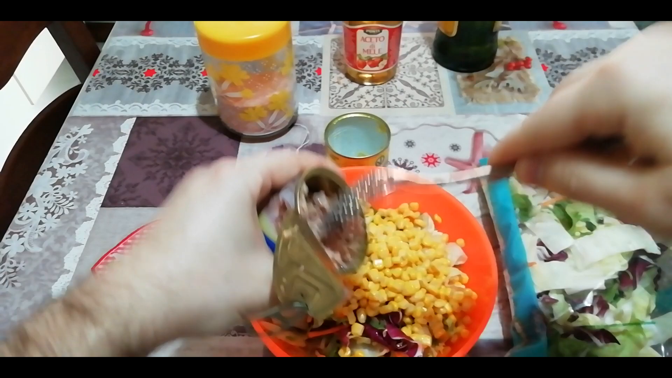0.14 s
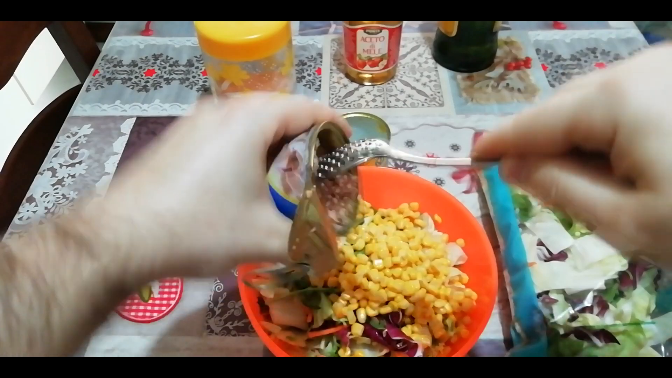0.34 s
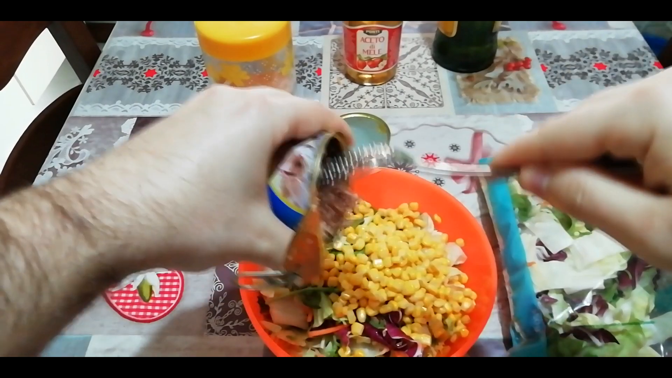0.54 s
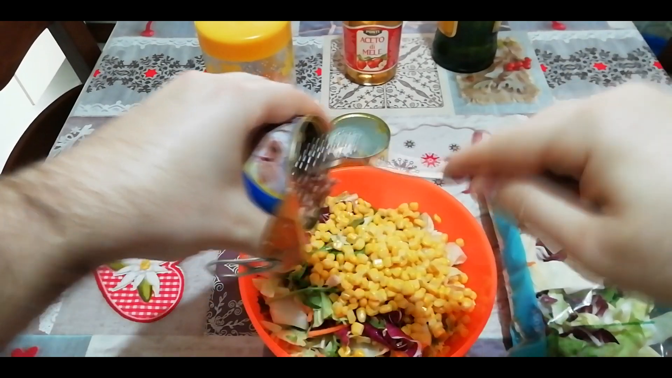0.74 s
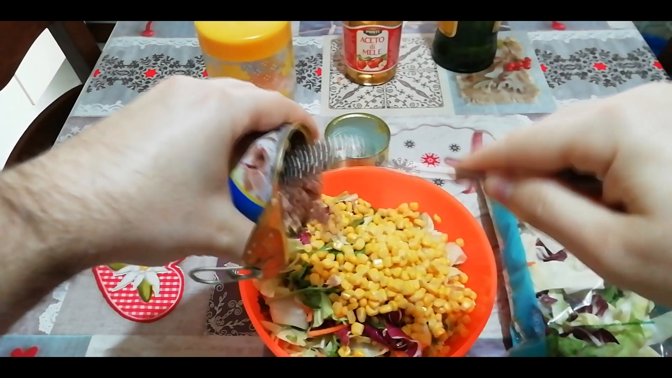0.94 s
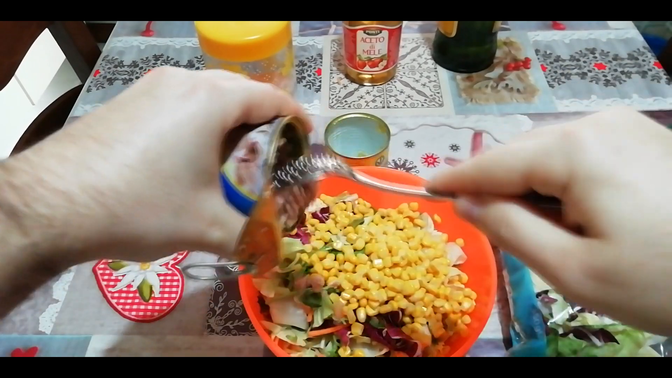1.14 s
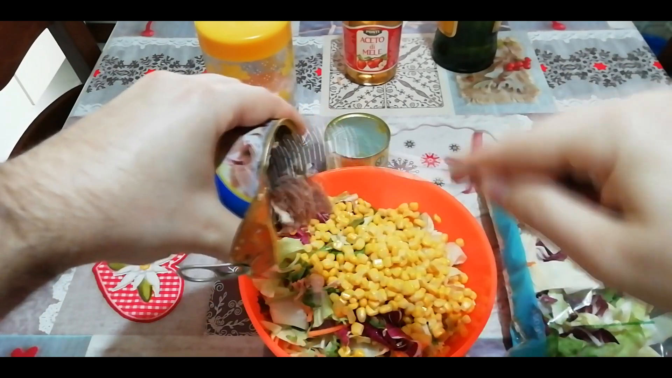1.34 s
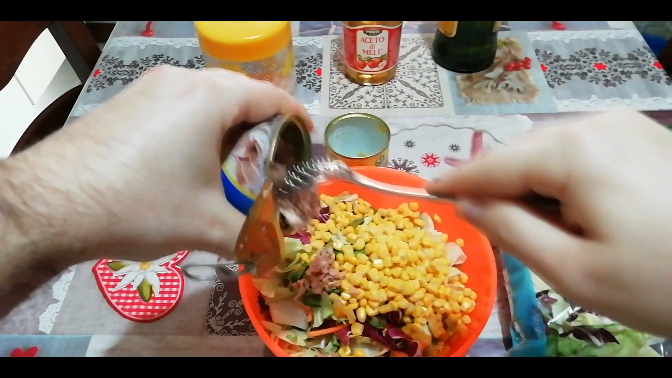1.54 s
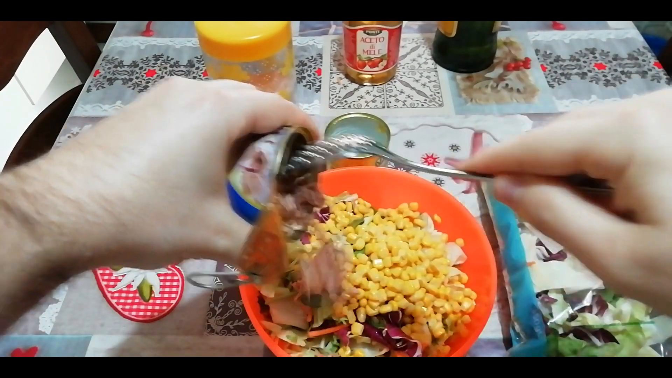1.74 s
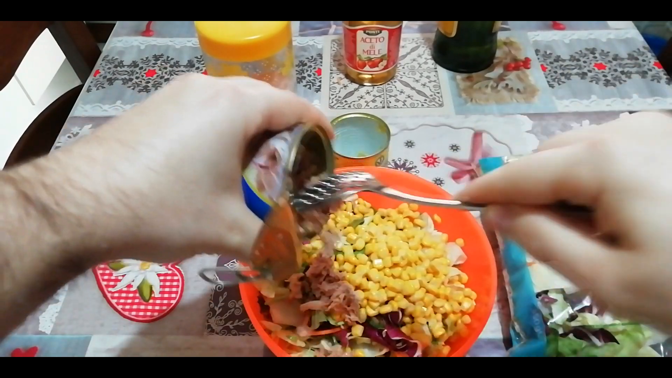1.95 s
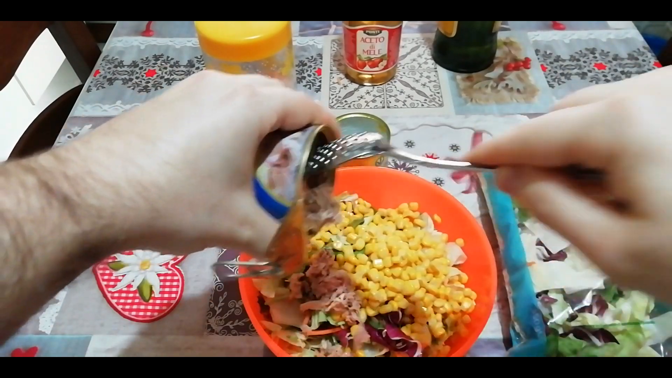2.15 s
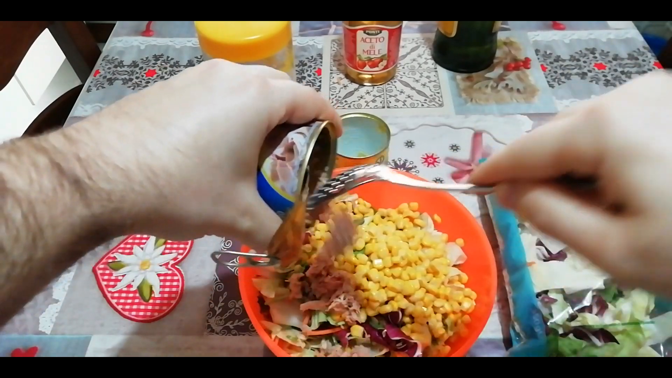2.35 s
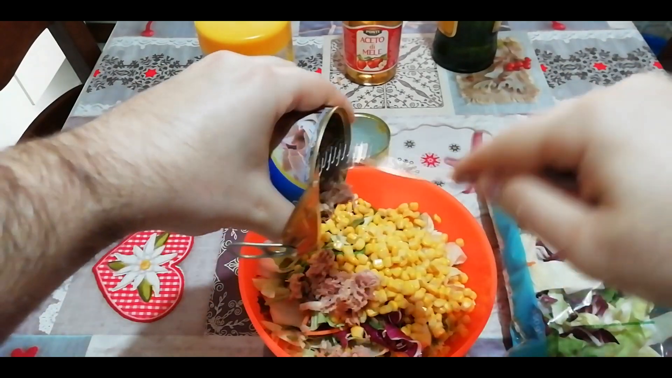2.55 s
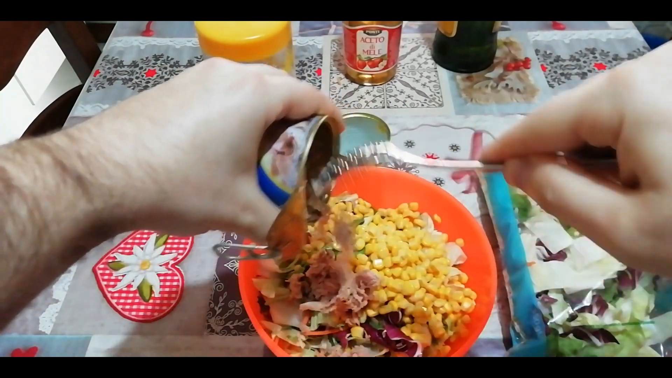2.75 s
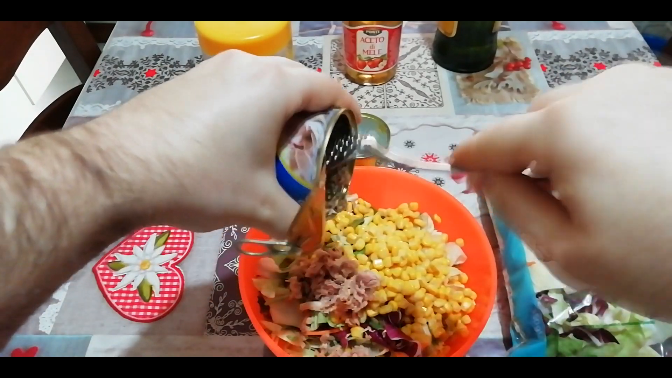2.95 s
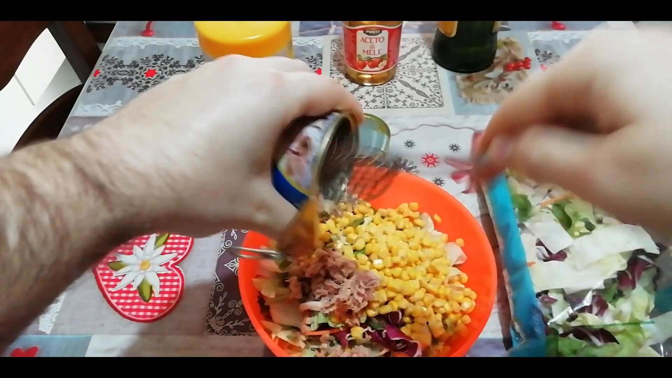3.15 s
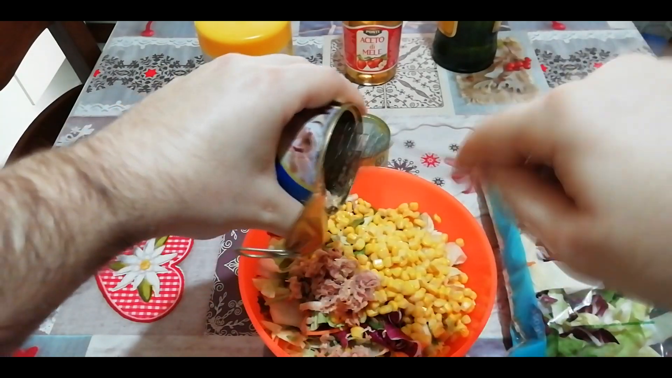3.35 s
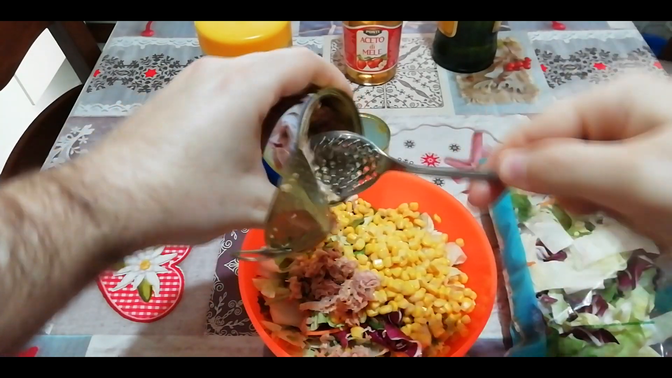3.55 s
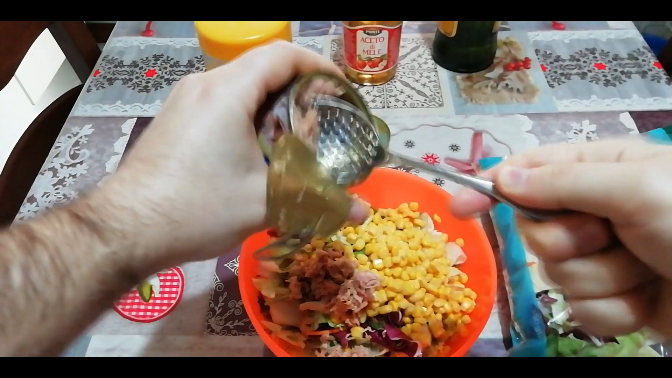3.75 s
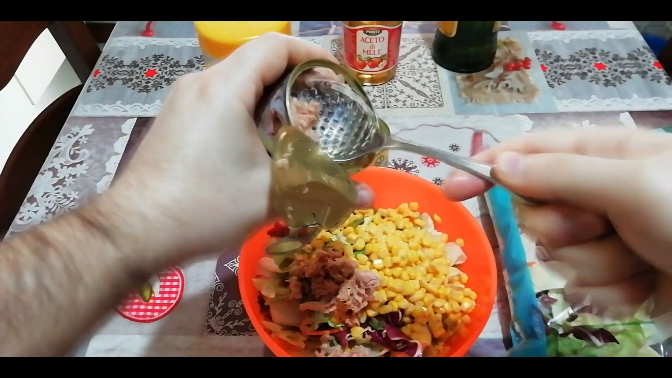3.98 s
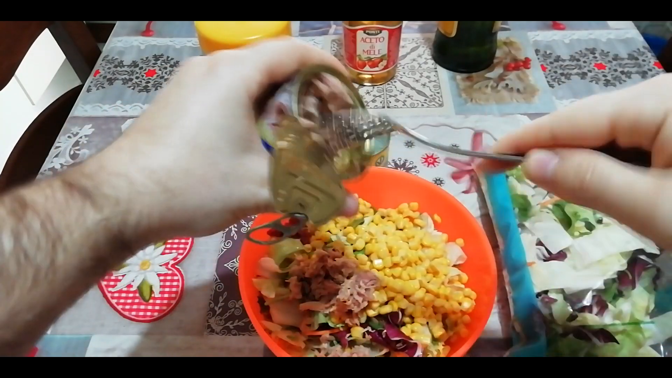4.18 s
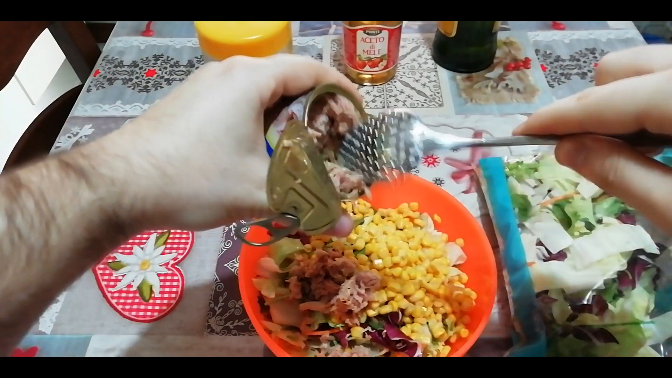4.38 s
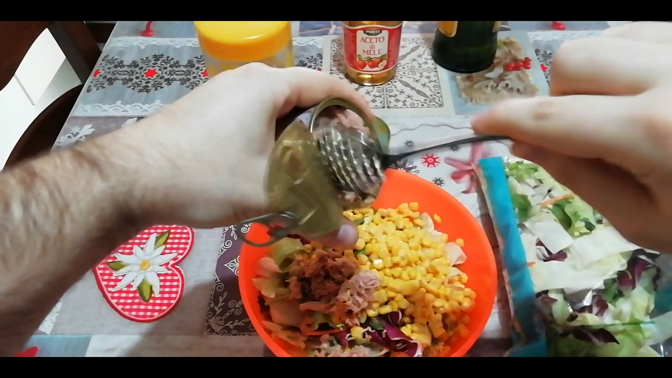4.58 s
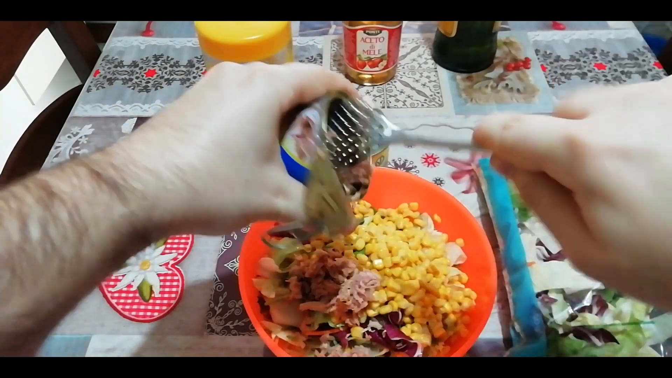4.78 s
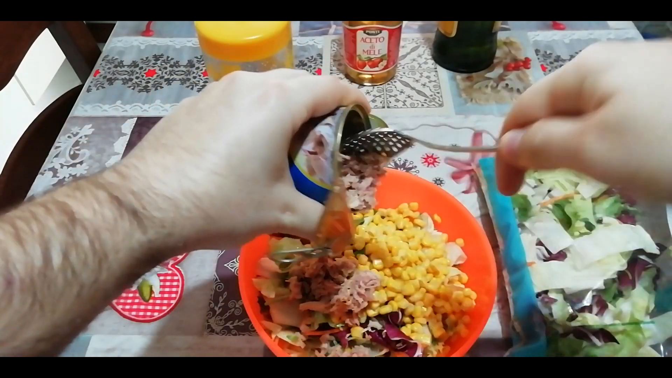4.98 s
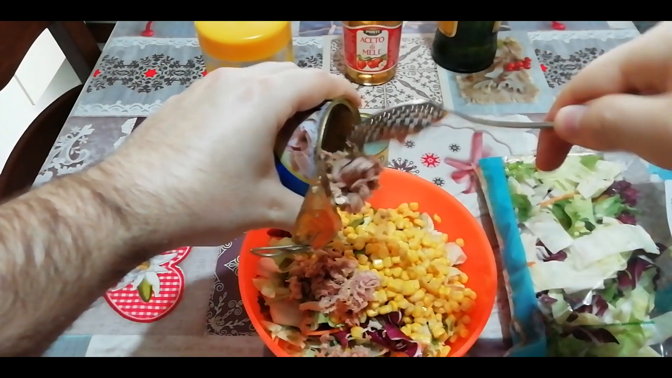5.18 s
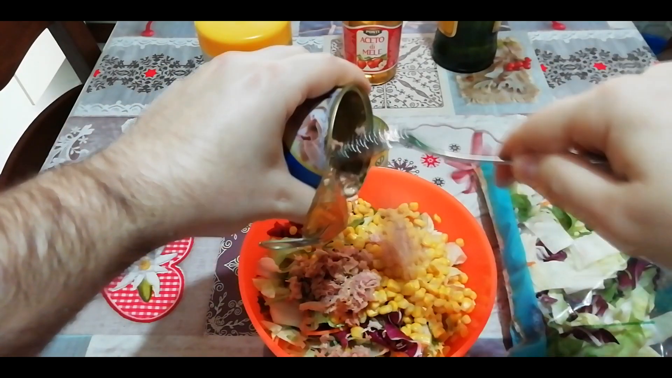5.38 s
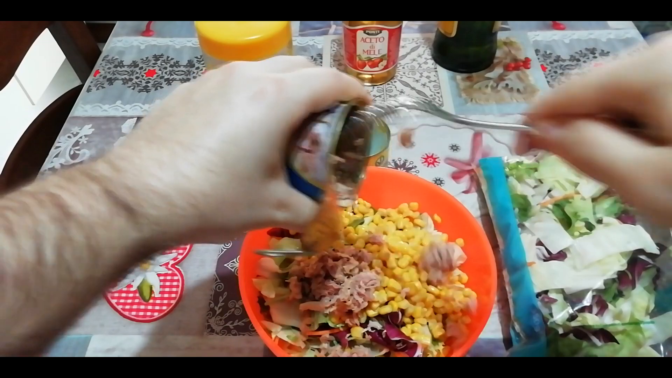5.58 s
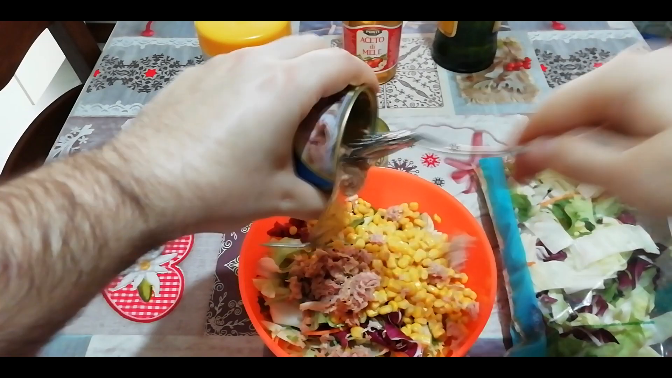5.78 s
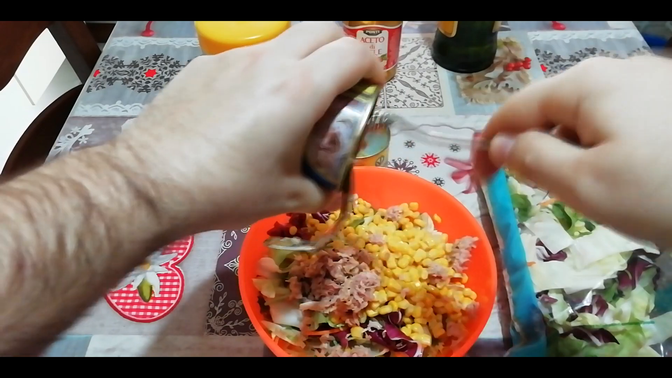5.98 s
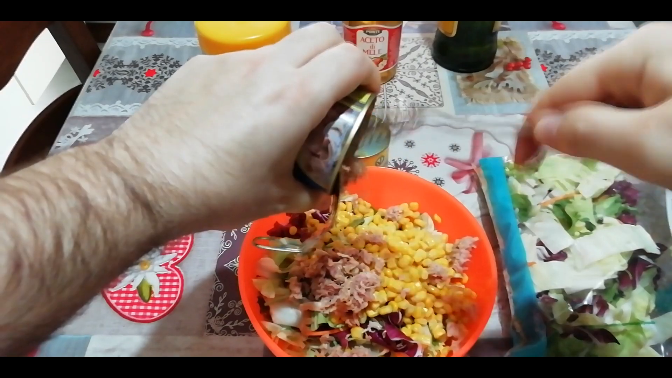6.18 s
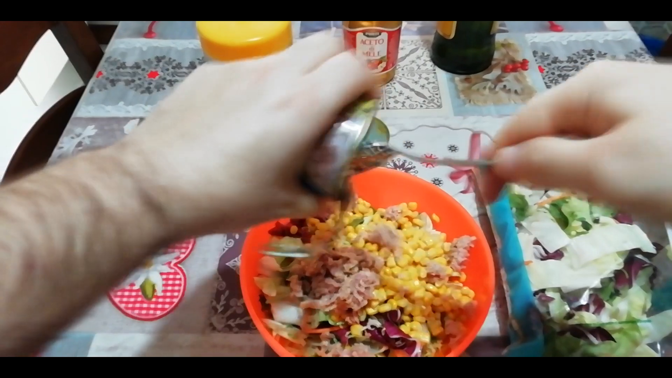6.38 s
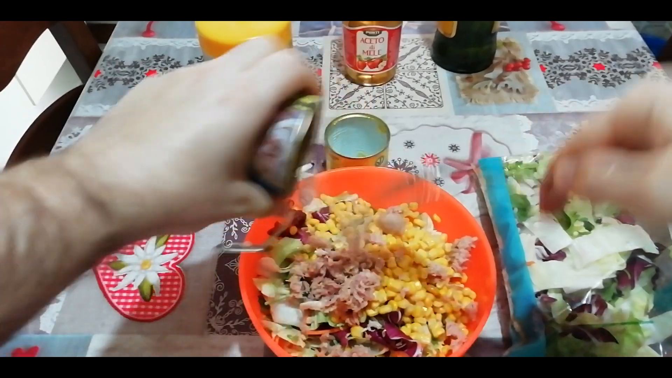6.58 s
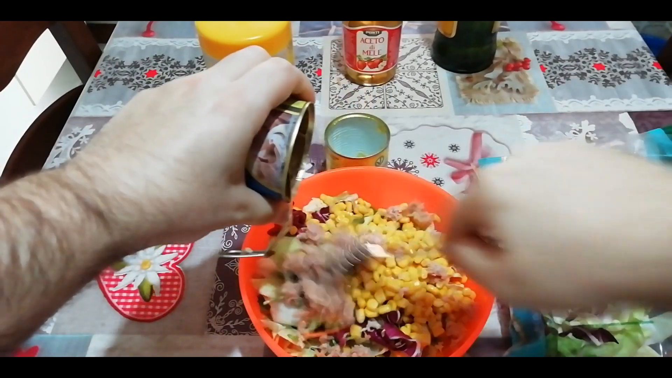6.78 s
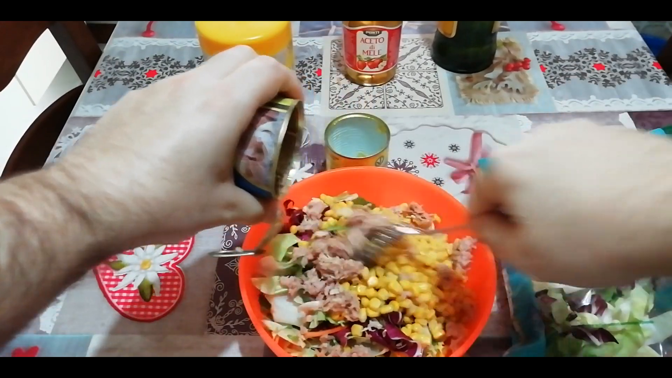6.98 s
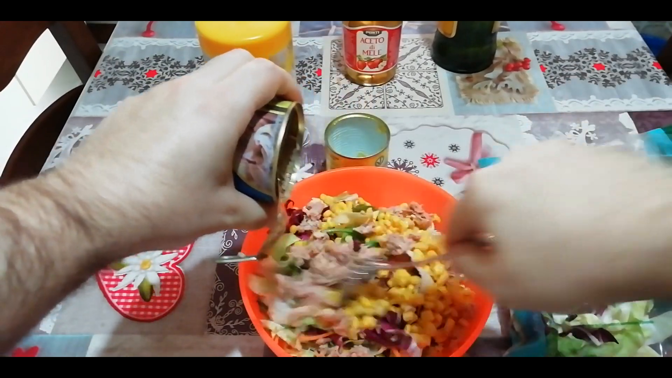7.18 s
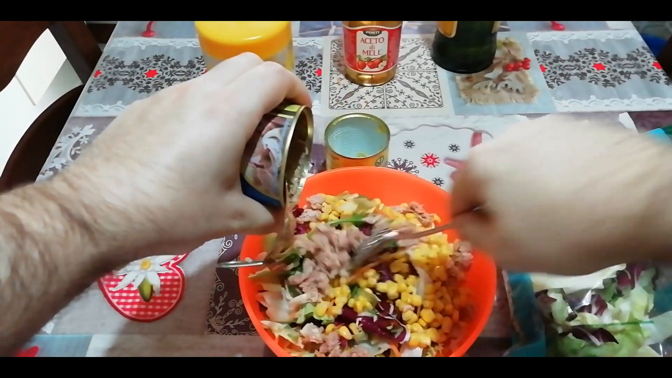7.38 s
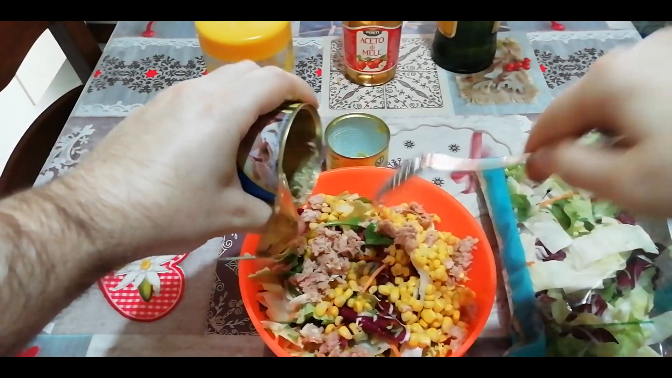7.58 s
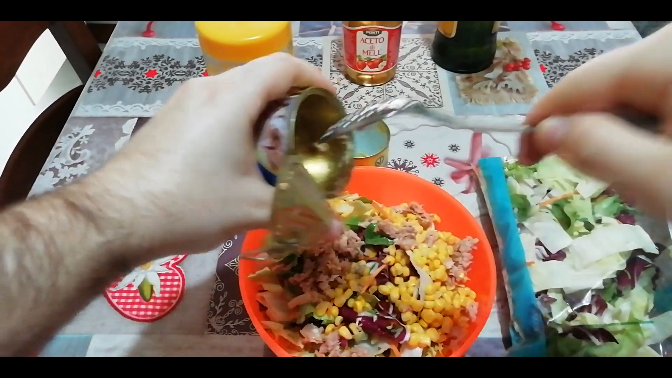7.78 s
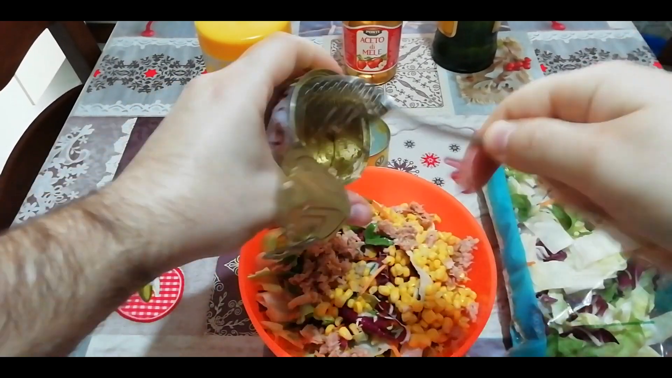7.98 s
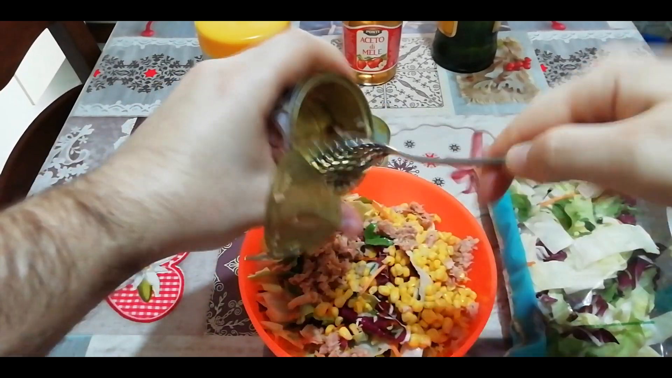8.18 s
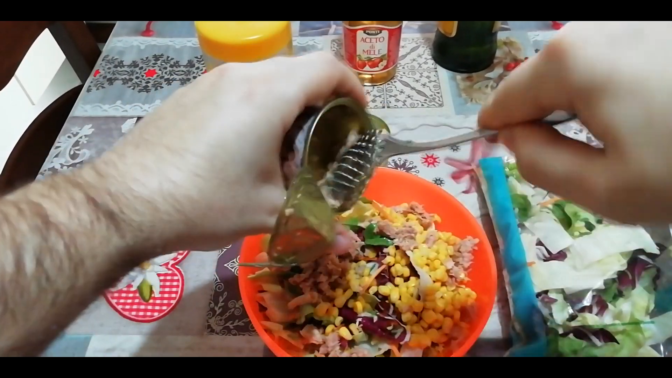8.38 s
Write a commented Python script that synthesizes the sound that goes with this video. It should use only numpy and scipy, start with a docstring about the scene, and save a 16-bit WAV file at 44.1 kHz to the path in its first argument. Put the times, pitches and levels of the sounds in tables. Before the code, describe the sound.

Close metallic taps and short gritty scrapes of fork on tin, soft wet food rustle, then brighter ringing knocks as the tin empties.

```python
"""In a small kitchen a fork digs tuna out of a hand-held tin over a salad bowl, close to two microphones.
Knocks are impulses into damped resonances of tin and fork; scrapes drive the same metal by stick-slip.
The wall is dull while the tin is full; as it empties, knocks ring longer and scrapes ring higher.
Coloured noise pops make the moist food, ticking flakes and fizzing oil; still air and a faint hum lie below."""
import sys
import numpy as np
from scipy import signal
from scipy.fft import rfft, irfft, next_fast_len
from scipy.io import wavfile

SR = 44100
rng = np.random.default_rng(int(sys.argv[2]) if len(sys.argv) > 2 else 0)


def generate_wav(signal):
    """Clip the signal to [-1, 1] and save it as 16-bit WAV at the path in sys.argv[1]."""
    frames = np.transpose(np.atleast_2d(signal))
    scaled = np.clip(frames, -1, 1) * 32767
    pcm = np.round(scaled).astype(np.int16)
    wavfile.write(sys.argv[1], SR, pcm)


N = 371763
TIME = np.arange(N) / SR
CUTOFF_HZ = 15800
FORK_HZ = 2805
STEEL_FOLLOWS = .4   # dB per dB: more tines or a harder push also rings the fork more

# frequency ranges of lid, wall, fork shank and tines [low_hz, high_hz]
PART_RANGES = [(260, 1000), (1050, 2300), (2350, 4400), (4600, 16500)]
# friction spectrum of steel on tin [frequency_hz, gain_db]
FRICTION_SPECTRUM = [(300, -13.5), (1500, -2), (3700, -1.5), (4500, -2), (7200, -1.5), (7800, 2.5),
                     (11000, -2), (15000, -4)]


def from_db(db):
    """Amplitude gain is ten to the power of decibels over twenty."""
    return 10 ** (np.asarray(db) / 20)


def rms_one(x):
    """Normalization divides a signal by its root mean square."""
    return x / np.sqrt(np.mean(x ** 2) + 1e-20)


def at_hz(points, hz, axis=1):
    """A spectrum is interpolated linearly on a log-frequency axis."""
    points = np.array(points)
    return np.interp(np.log(np.maximum(hz, 1)), np.log(points[:, 0]), points[:, axis])


def colour(x, spectrum):
    """Linear filtering multiplies a signal's spectrum by a gain curve."""
    n = x.shape[-1]
    size = next_fast_len(n)
    gain = from_db(at_hz(spectrum, np.fft.rfftfreq(size, 1 / SR)))
    return irfft(rfft(x, size) * gain, size)[..., :n]


def band(x, low, high, order=3):
    """A causal Butterworth band-pass keeps one frequency range."""
    edges = [low, min(high, SR / 2 - 100)]
    return signal.sosfilt(signal.butter(order, edges, "band", fs=SR, output="sos"), x)


def drift(per_s, n):
    """Slow random modulation joins Gaussian values, drawn per_s times a second, by straight lines."""
    place = np.arange(n) * per_s / SR
    knots = np.random.default_rng(rng.integers(2 ** 31)).standard_normal(int(place[-1]) + 2)
    return np.interp(place, np.arange(len(knots)), knots)


def resonate(x, hz, width):
    """A damped mode is a two-pole resonance, with gain near 1 at its peak; its width sets its decay."""
    r = np.exp(-np.pi * width / SR)
    zeros = np.array([1, 0, -1]) * (1 - r * r) / 2
    poles = [1, -2 * r * np.cos(2 * np.pi * hz / SR), r * r]
    return signal.lfilter(zeros, poles, x + 1e-18)


def grains(n, per_s, spread_db):
    """A random point process gives clicks of uneven size and either sign."""
    sizes = from_db(spread_db * np.minimum(rng.exponential(1, n), 4)) * rng.choice([-1, 1], n)
    return sizes * (rng.random(n) < per_s / SR)


def add(track, s, sound):
    """Superposition mixes a sound into the track at time s."""
    at = max(round(s * SR), 0)
    track[..., at:at + sound.shape[-1]] += sound[..., :N - at]


def pushes(rows, steepness=1):
    """Each push is an asymmetric exponential envelope that grows to its peak and dies away."""
    build_share = 0.63
    total = 0
    for s, length, db in rows:
        time_constant = length * np.where(TIME < s, build_share, 1 - build_share)
        total = total + from_db(db) * np.exp(-np.abs((TIME - s) / time_constant) ** steepness)
    return total


def fill_at(s):
    """Mass loading and damping follow the share of tuna in the tin."""
    # tuna in the tin [time_s, share 0-1]
    fill_curve = [(0, 0.82), (3, 0.9), (5.4, 0.47), (5.7, 0.42), (8.4, 0.18)]
    return np.clip(np.interp(s, *np.transpose(fill_curve)), 0, 1)


def metal(force, gripped_modes, scatter_db, shifts_per_s):
    """Modal synthesis: the contact point sets each mode's drive; grip and filling tune a few more modes."""
    # modes that ring wherever the metal is touched [frequency_hz, width_hz, gain_db]
    fixed_modes = [(480, 220, -7), (1318, 80, 9), (2802, 80, 6), (3290, 200, 2), (3780, 260, 1),
                   (5480, 200, 5), (5890, 240, 4), (6350, 320, 1), (6850, 450, 5), (10200, 800, -8),
                   (13200, 1200, -6), (14850, 700, -2)]
    total = 0
    for hz, width, db in fixed_modes + gripped_modes:
        drive = force * from_db(db + scatter_db * drift(shifts_per_s, len(force)))
        total = total + resonate(drive, hz, width)
    return total


def background():
    """Noise correlated between the sides in the bass is still air; modulated sinusoids are the hum."""
    # still kitchen air [frequency_hz, gain_db]
    air_spectrum = [(15, -33), (30, -4.5), (55, -14.5), (85, -8), (125, -11), (160, -9.5), (200, -9),
                    (250, -9.5), (370, -15.5), (500, -17.5), (700, -23), (1500, -20), (2400, -23.5),
                    (10000, -30.5), (15000, -27), (16500, -46)]
    # left-right likeness of the air [frequency_hz, correlation]
    air_correlation = [(60, 1), (130, 0.78), (290, 0), (640, 0), (3000, 0.056)]
    # appliance hum [frequency_hz, rms_level_db, unsteadiness 0-1]
    hum_lines = [(79.6, -81, 0.3), (98.7, -76, 1), (196.6, -69, 0), (295, -83.5, 0.99), (432, -84.5, 0.11),
                 (487, -83, 0.4), (650, -88, 1)]
    air_rms_db = -69.5
    size = next_fast_len(N)
    alike = np.clip(at_hz(air_correlation, np.fft.rfftfreq(size, 1 / SR)), -1, 1)
    mid, side = rfft(rng.standard_normal((2, size)))
    air = irfft(np.sqrt(1 + alike) * mid + np.sqrt(1 - alike) * side * [[1], [-1]])[:, :N]
    hum = 0
    for line_hz, db, unsteady in hum_lines:
        # a complex modulation wavers in both level and phase
        waver = 1 + unsteady * (drift(7.2, N) + 1j * drift(9.7, N))
        line = np.real(waver * np.exp(2j * np.pi * line_hz * TIME))
        hum = hum + from_db(db) * rms_one(line)
    return from_db(air_rms_db) * rms_one(colour(air, air_spectrum)) + hum


def food(level_db=-2, smear_db=-12):
    """Granular noise: wet flakes part in clumps of tiny pops, one stream per range, over a soft smear."""
    # fork pushes in the tin, then in the bowl [peak_s, length_s, relative_level_db]
    stirring = [(0.158, 0.099, -61), (0.573, 0.12, -58), (0.95, 0.23, -65.5), (1.2, 0.23, -72),
                (3.512, 0.096, -70), (3.726, 0.069, -62.5), (6.714, 0.15, -51), (6.823, 0.017, -50.5),
                (6.973, 0.12, -45)]
    # moist food [frequency_hz, gain_db]
    food_spectrum = [(180, -37), (300, -19), (494, -18.5), (593, -34), (624, -19.5), (1190, -7),
                     (2400, -12), (2930, -7.5), (4160, -11.5), (6410, -10.5), (7950, -13.5), (14700, -18),
                     (16000, -33)]
    rustle = from_db(smear_db) * rng.standard_normal((2, N))
    for low, high in PART_RANGES:
        pops = grains(N, 1300, spread_db=3.5)
        clumps = pops * from_db(3.5 * drift(80, N))
        stereo_pops = rms_one(clumps * (1 + rng.standard_normal((2, N))))
        rustle = rustle + band(stereo_pops, low, high, order=2)
    return from_db(level_db) * pushes(stirring) * rms_one(colour(rustle, food_spectrum))


def ticks(decay_s=0.0017, broadband_db=-9, level_db=-1):
    """Sudden release: a film of oil snaps as flakes part, a short burst around one heavily damped resonance."""
    # snaps [start_s, relative_peak_db, centre_hz]
    snap_events = [(0.2094, -43, 4000), (0.2274, -38, 6650), (0.9802, -38, 6700), (1.1692, -41.5, 5830),
                   (1.329, -38, 6300), (1.718, -34, 6900), (2.0812, -41.5, 14700), (3.6042, -43.5, 3500),
                   (5.467, -35.5, 11000), (5.5214, -32, 6900), (6.6134, -37, 3050), (6.7775, -24.5, 4100),
                   (6.8483, -36.5, 1130), (7.0404, -39, 1200)]
    out, t = np.zeros((2, N)), TIME[:SR // 50]
    for s, db, hz in snap_events:
        snap = colour(rng.standard_normal((2, len(t))), FRICTION_SPECTRUM) * np.exp(-t / decay_s)
        broadband = from_db(broadband_db) * band(snap, 2000, 16000, order=1)
        sound = resonate(snap, hz, hz / 2) + broadband
        add(out, s, sound / np.abs(sound).max() * from_db(db + level_db))
    return out


def knocks(crack_db=-9, chatter_db=-16, chatter_s=0.0031, crack_s=.0022,
           thump_db=-41, thump_s=0.042, sustain_db=3, wall_pan_db=-3):
    """Impulse excitation: a sharp contact with brief chatter sets lid, wall, fork and tines ringing."""
    # knocks; spot and angle set each part's share, the last three against the wall
    # [start_s, wall_hz, wall_level_db, lid_db, fork_shank_db, tines_db]
    knock_events = [(0.421, 1376, -34, -15, -5.5, -10), (0.7834, 1110, -38.5, -12.5, -21, -21),
                    (1.555, 1396, -31.5, -19, -10.5, -5), (1.8947, 1480, -42, -10, 9.5, 0.5),
                    (2.2517, 1730, -29, -22.5, -3.5, -12), (2.265, 2030, -38.5, -28, 2.5, 0.5),
                    (2.281, 1170, -48.5, 7, -12, -4), (2.6103, 1600, -32.5, -13.5, 3, -1),
                    (2.9636, 1430, -53, -16, 1, -4), (3.0014, 1600, -36, -14.5, 3, -0.5),
                    (3.0298, 1280, -39, -8, -26, -45), (3.7792, 1540, -49, -8.5, 0.5, -0.5),
                    (4.1382, 1674, -43.5, -16, 6.5, -4), (4.2166, 1327, -28, -14.5, -14.5, -12),
                    (4.246, 1570, -24.5, -24, 5.5, -7), (4.2984, 1684, -32.5, -16, 7.5, 7.5),
                    (5.0846, 1553, -35.5, -17.5, 3.5, 3), (5.3836, 1610, -50.5, -34, 5.5, 6),
                    (5.639, 1500, -31.5, -19.5, -3, -3.5), (5.6688, 1880, -23, -18.5, -5, -15.5),
                    (5.8043, 1250, -46.5, -3.5, -30.5, -8), (5.9711, 1750, -30, -15.5, -26, -16.5),
                    (6.0133, 1924, -19.5, -31.5, -9, -13), (7.6288, 1716, -16.5, -24, -41, -8.5),
                    (7.6294, 1333, -22, -38.5, -32, -11), (7.711, 1754, -29, -9, 11.5, 9.5),
                    (7.8584, 1660, -34, -9.5, 7.5, 6.5), (8.0636, 1775, -47, -22.5, -34, -7.5),
                    (8.2801, 1703, -28.5, -16, 4, -3), (8.3529, 1660, -38, -11.5, -19, -17),
                    (8.3949, 1550, -17, -10.5, -2, -6.5)]
    # crowd of short-lived high modes [frequency_hz, gain_db]
    crack_spectrum = [(300, -16.5), (1000, 15), (1500, -23), (3700, 17.5), (4600, 6.5), (7100, 21.5),
                      (7700, 16), (11000, 12.5), (15000, 4)]
    empty_width_hz, tuna_width_hz = 25, 190   # mode width of the bare wall; what a full tin adds
    empty_lid_hz, tuna_lid_rise_hz = 780, 110   # the lid sits higher while the full tin is gripped hard
    base_hz = 634
    lid_mode_db, base_mode_db, wall_mode_db, fork_mode_db = 21.5, 8.5, 22, 6.5
    lid_follows = .55   # dB per dB: knocks weighted to the lid rather than the tines ring its mode more
    out, t = np.zeros((2, N)), TIME[:SR // 4]
    attack = SR // 100
    for s, wall_hz, wall_db, lid_db, fork_db, tines_db in knock_events:
        width = empty_width_hz + tuna_width_hz * fill_at(s)
        lid_hz = empty_lid_hz + tuna_lid_rise_hz * fill_at(s)
        chatter = band(rng.standard_normal(len(t)), 1100, 16000, order=2) * np.exp(-t / chatter_s)
        force = from_db(chatter_db) * chatter / 2
        force[0] += 1   # the contact impulse
        # the dense high modes reach each microphone with other phases
        crack = colour(rng.standard_normal((2, len(t))), crack_spectrum) * np.exp(-t / crack_s)
        crack /= np.sqrt(crack_s * SR / 2)
        steel_db = STEEL_FOLLOWS * tines_db
        gripped = [
            (lid_hz, width * .65, lid_mode_db + lid_follows * (lid_db - tines_db)),
            (base_hz, width * 1.4, base_mode_db + steel_db),
            (wall_hz, width, wall_mode_db),
            (FORK_HZ, width * 0.9 + 45, fork_mode_db + steel_db),
            # a faint narrow mode at the wall's pitch outlasts the main ring; tuna weakens it
            (wall_hz, 9, sustain_db - width / 50)]
        sound = metal(force, gripped, scatter_db=4.5, shifts_per_s=1.0) + from_db(crack_db) * crack
        # the wall leans toward the right
        wall_sides_db = wall_pan_db * np.array([[1], [-1]]) / 2
        levels = [lid_db, wall_sides_db, fork_db, tines_db]
        for (low, high), db in zip(PART_RANGES, levels):
            part = band(sound, low, high)
            attack_rms = np.sqrt(np.mean(part[:, :attack] ** 2))
            add(out, s, part / attack_rms * from_db(wall_db + db))
        # the whole tin jolts in the hand
        thump = rms_one(band(rng.standard_normal(len(t)), 45, 150, order=2)) * np.exp(-t / thump_s)
        add(out, s, thump * from_db(wall_db + thump_db))
    return out


def scrapes(rasp_db=1, catch_db=2.5, catches_per_s=110, wall_width_hz=170, wall_ring_db=14,
            fork_width_hz=95, fork_ring_db=10, grip_scatter_hz=25, level_db=-2.5):
    """Stick-slip friction: dense clicks swell and fade with the push and drive the same metal."""
    # fork slides on the tin [peak_s, length_s, relative_level_db, hardness_db]
    slides = [(0.464, 0.022, -44, -11), (0.817, 0.035, -42.5, -11.5), (1.234, 0.025, -60, -1),
              (1.577, 0.033, -47, -8), (1.654, 0.043, -59.5, 8.5), (1.941, 0.028, -37, -3.5),
              (2.395, 0.024, -41, 5.5), (2.637, 0.021, -38.5, -4.5), (2.813, 0.031, -50.5, 0),
              (3.029, 0.048, -47.5, -3.5), (3.109, .034, -35, 3), (3.189, 0.1, -52, 0.5),
              (3.334, 0.14, -46, -1.5), (3.374, .025, -42.5, -7), (3.83, 0.047, -40, 1),
              (3.903, 0.016, -52.5, 5.5), (4.194, 0.039, -41, 0.5), (4.386, 0.05, -38, 6.5),
              (4.516, 0.07, -40, -2), (4.6, 0.092, -43.5, -3.5), (4.69, 0.074, -46, -1.5),
              (5.129, 0.038, -48, 4), (5.166, 0.02, -46, 4), (5.398, 0.011, -39, 1.5),
              (5.832, 0.15, -49, -7.5), (5.994, 0.018, -27.5, -5), (6.022, 0.0078, -23.5, -3.5),
              (8.108, 0.023, -66, 8.5)]
    # a harder push sends more into the steel; one row each for lid, wall, fork and tines
    # [relative_level_db at hardness 0, slope in dB per dB of hardness]
    part_shares = [(-10.5, -.05), (-0.5, 0), (3, 1.1), (-1, 1.16)]
    empty_wall_hz, tuna_sag_hz = 1860, 328   # pitch of the scraped wall; how far a full tin lowers it
    swell_share = 0.54   # part of a scrape spent building up
    out = np.zeros((2, N))
    t = TIME[:SR * 2 // 5] - 1 / 5   # zero at the hardest push
    for s, length, scrape_db, hardness_db in slides:
        spread_s = length * np.where(t < 0, swell_share, 1 - swell_share)
        push = np.exp(-(t / spread_s) ** 2 / 2)
        wall_hz = empty_wall_hz - tuna_sag_hz * fill_at(s)
        fork_hz = FORK_HZ + grip_scatter_hz * rng.standard_normal()
        # the tines catch and let go unevenly
        slips = grains(len(t), 4000, spread_db=3.2) * from_db(2.5 * drift(300, len(t)))
        force = colour(slips, FRICTION_SPECTRUM) * push
        rasp = colour(slips * rng.standard_normal((2, len(t))), FRICTION_SPECTRUM) * push
        gripped = [(wall_hz, wall_width_hz, wall_ring_db),
                   (fork_hz, fork_width_hz, fork_ring_db + STEEL_FOLLOWS * hardness_db)]
        rings = metal(force, gripped, scatter_db=5, shifts_per_s=60)
        sound = rings + from_db(rasp_db) * rasp
        for (low, high), (share_db, follows) in zip(PART_RANGES, part_shares):
            accents = from_db(catch_db * drift(catches_per_s, len(t)))
            part = rms_one(band(sound, low, high) * accents) * np.sqrt(np.mean(push ** 2))
            part_db = scrape_db + share_db + follows * hardness_db + level_db
            add(out, s + t[0], part * from_db(part_db))
    return out


def squelches(low_hz=11000):
    """Bubble noise: oil squeezed from under the tines bursts in a fine, high fizz of random pops."""
    # fizzes [peak_s, length_s, level_db]
    oil_pushes = [(1.93, 0.032, -44.5), (2.398, 0.034, -46), (2.625, 0.013, -43), (2.813, 0.026, -48.5),
                  (3.35, 0.13, -51), (3.83, 0.049, -41.5), (5.165, 0.048, -41), (5.395, 0.016, -41.5)]
    pops = grains(N, 6000, spread_db=3) * rng.standard_normal((2, N))
    fizz = rms_one(band(pops, low_hz, CUTOFF_HZ, order=1))
    return pushes(oil_pushes, steepness=2) * fizz


def kitchen(x, first_echo_s=0.00037, build_s=0.0012):
    """Diffuse reverberation: convolution with noise that builds up quickly and lasts longest in the bass."""
    # reverberation [frequency_hz, t60_s, relative_level_db]
    room_decay = [(201, 0.79, 4.5), (840, 0.48, -5), (2110, 0.37, -7.5), (5550, 0.32, -5.5),
                  (10000, 0.39, -7.5), (15110, 0.3, -13.5)]
    t, response = TIME[:SR * 2 // 3], 0
    onset = 1 - np.exp(-np.maximum(t - first_echo_s, 0) / build_s)
    edges = np.geomspace(100, 18000, 12)
    for low, high in zip(edges, edges[1:]):
        hz = np.sqrt(low * high)
        decay = onset * from_db(-60 * t / at_hz(room_decay, hz))
        echoes = band(rng.standard_normal((2, len(t))), low, high, order=2)
        gain = from_db(at_hz(room_decay, hz, axis=2)) / np.sqrt(np.sum(decay ** 2))
        response = response + echoes * decay * gain
    return signal.fftconvolve(x, response, axes=-1)[:, :N]


def scene():
    """Arrival-time difference: the work goes on a little nearer to the left microphone."""
    # colouration by the two microphone ports [frequency_hz, left_db, right_db]
    port_gains = [(100, 1.5, 4.5), (400, -1.5, 1), (750, -2.5, -6.5), (1030, 1.5, -3), (1390, 0, 1),
                  (2600, 2, 0), (4160, -.5, -1), (6050, -0.5, 2.5), (7040, -12.5, 5), (7900, -9.5, -4.5),
                  (10850, 0.5, -2), (15000, 8, -6)]
    right_lag_s = .000147
    near = food() + ticks() + knocks() + scrapes() + squelches()
    direct = np.array([near[0], np.interp(TIME - right_lag_s, TIME, near[1])])
    left, right = direct + kitchen(near)
    left = colour(left, [(hz, db) for hz, db, _ in port_gains])
    right = colour(right, [(hz, db) for hz, _, db in port_gains])
    return np.array([left, right]) + background()


def record(dry):
    """Band limiting: an elliptic low-pass cuts the top steeply."""
    return signal.sosfilt(signal.ellip(10, .2, 80, CUTOFF_HZ, fs=SR, output="sos"), dry)


dry = scene()
out = record(dry)
generate_wav(out)
```